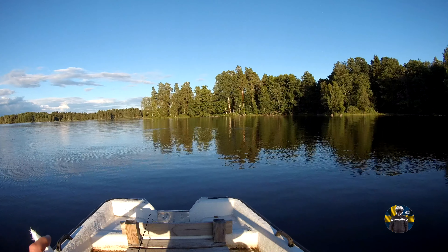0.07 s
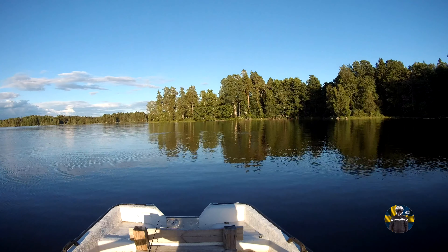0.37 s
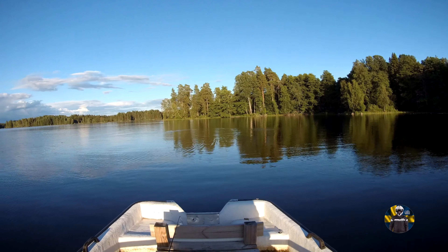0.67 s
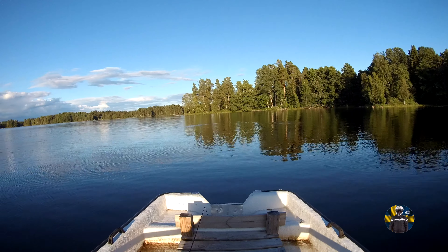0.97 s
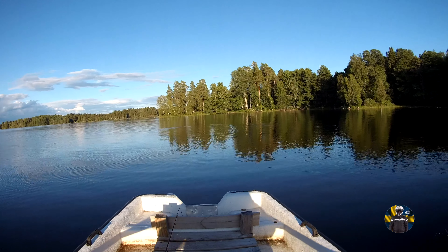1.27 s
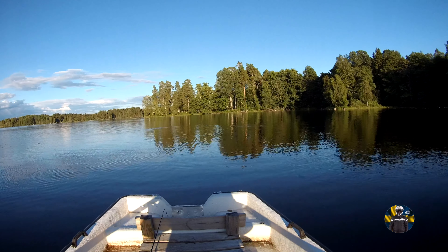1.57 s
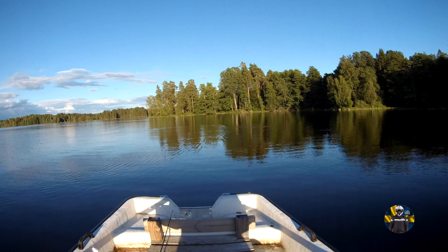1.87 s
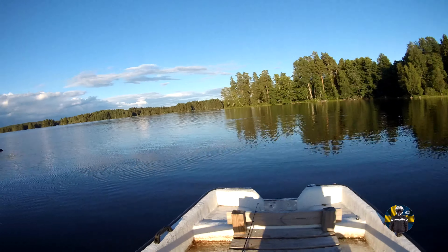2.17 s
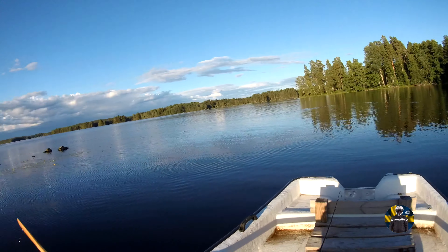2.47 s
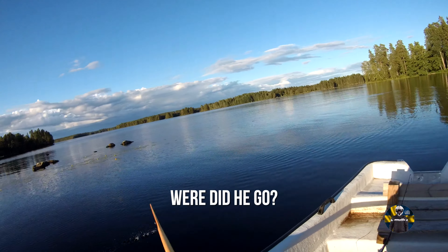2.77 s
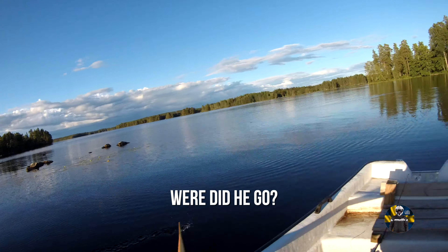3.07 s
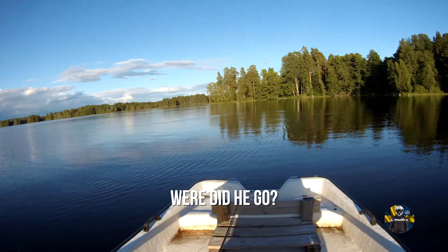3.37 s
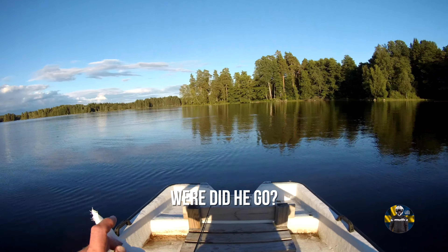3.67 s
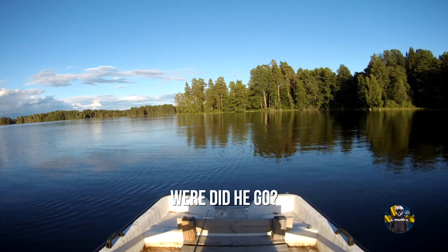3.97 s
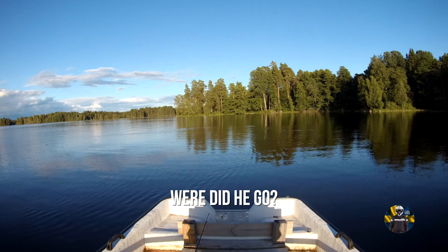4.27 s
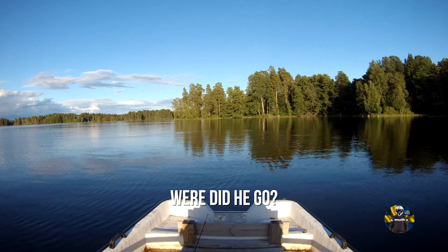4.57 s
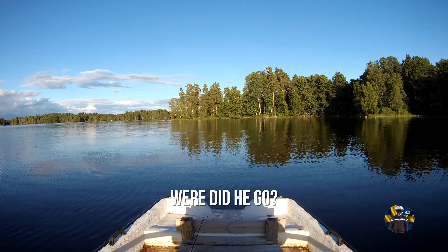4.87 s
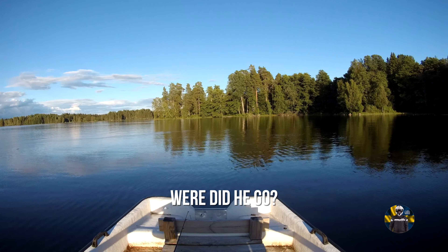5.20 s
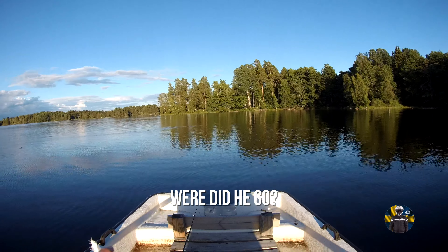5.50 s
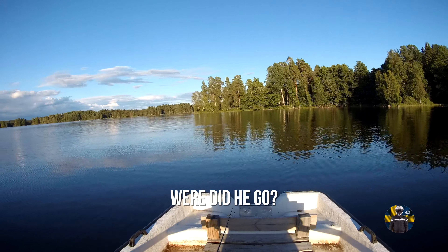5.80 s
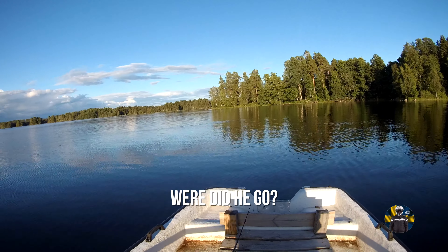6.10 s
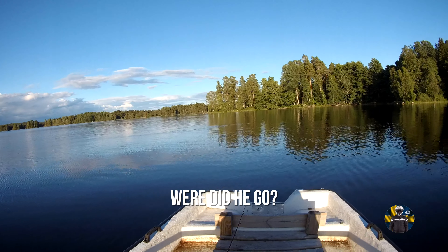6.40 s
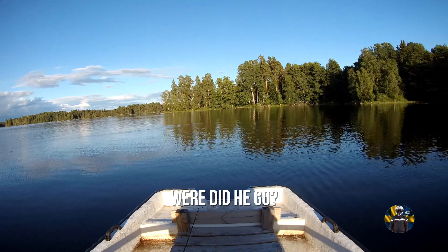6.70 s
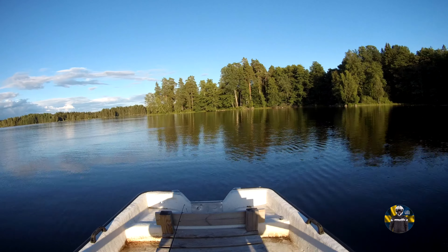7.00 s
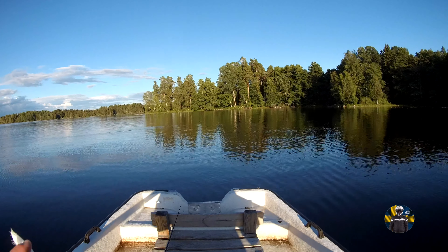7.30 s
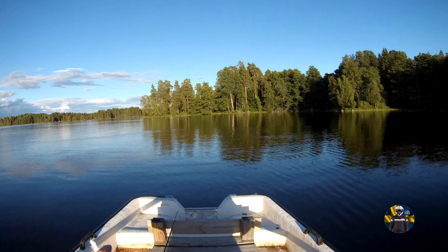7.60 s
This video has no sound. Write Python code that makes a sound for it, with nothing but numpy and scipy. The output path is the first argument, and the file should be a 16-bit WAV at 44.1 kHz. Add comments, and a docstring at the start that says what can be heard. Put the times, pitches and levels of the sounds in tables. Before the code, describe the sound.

Oars creak and knock in a small rowboat through four slow strokes, with low water gulps, drips and faint wind.

```python
"""Wooden barks, clacks and gulps of water: four strokes of a small rowing boat on a calm lake, heard
from the rower's seat. On each swing back, stick-slip friction in a dry rowlock drives the modes of the
hull; the oars strike their pins as the blades leave and enter the water. Trapped air resonates in gulps,
drips and lapping waves, and one eddy gives a rising note. Beneath them the hull booms softly and a
faint wind stirs."""
import sys
import numpy as np
from scipy import signal
from scipy.fft import rfft, irfft
from scipy.io import wavfile
from scipy.ndimage import uniform_filter1d

SR = 44100
rng = np.random.default_rng(int(sys.argv[2]) if len(sys.argv) > 2 else 0)


def transcribe(signal):
    """Save signal, clipped to [-1, 1], as a 16-bit WAV file at the path in sys.argv[1]."""
    frames = np.atleast_2d(signal).T
    limited = np.clip(frames, -1, 1)
    pcm = np.round(limited * 32767).astype(np.int16)
    wavfile.write(sys.argv[1], SR, pcm)


N = 337365
TIME = np.arange(N) / SR
RING_TIME = TIME[:SR // 2]

# Spectrum of the steady hiss. Each row: frequency in Hz, relative density in dB.
HISS_SPECTRUM = [(59, -35), (100, 0.5), (214, -14.5), (281, -13.5), (340, -13.5), (1090, -21),
                 (4370, -33.5), (14200, -35), (15500, -36.5)]
# Spectrum of water washing along the boat. Each row: frequency in Hz, relative density in dB.
WASH_SPECTRUM = [(60, -32), (140, 7), (300, 0.5), (600, -8), (1200, -15), (2500, -32), (6000, -52)]
# The blades finish their pull and lift out. Each row: start in seconds, length in seconds, boom in dB.
BLADE_LIFTS = [(1.14, 0.22, -38.5), (3.117, 0.21, -37.5), (4.902, 0.15, -40), (6.752, .38, -37)]
# The oars swing back and the rower's weight rocks the boat.
# Each row: start in seconds, length in seconds, boom in dB, wash in dB.
OAR_SWINGS = [(0.0, 0.033, -42.5, -42.5), (1.65, 0.24, -41, -51), (3.583, 0.25, -39, -55),
              (5.516, 0.18, -38, -49.5), (7.42, 0.17, -34, -49)]
# The blades dip in. Each row: start in seconds, boom in dB, wash in dB, trickle in dB.
BLADE_DIPS = [(.28, -34.5, -52, -60), (1.96, -33, -47, -60.5), (3.9, -38.5, -46, -60),
              (5.76, -35.5, -58, -64)]
# Small waves folding over. Each row: start in seconds, length in seconds, middle pitch in Hz, level in dB.
FOLDING_WAVES = [(0.328, 0.082, 343, -57), (2.8, 0.21, 219, -52), (3.002, 0.13, 216.7, -36.5),
                 (3.125, .07, 281, -45), (6.205, 0.22, 306, -56), (6.404, 0.042, 475, -46),
                 (6.676, 0.041, 488, -46), (7.067, 0.057, 201, -41), (7.553, 0.046, 746, -52)]
# Water gulping round a blade or under the hull.
# Each row: start in seconds, initial pitch in Hz, level in dB, 60 dB decay time in seconds.
WATER_GULPS = [(0.302, 96, -19.5, 0.099), (1.185, 109, -29, 0.21), (1.313, 103.4, -30.5, 0.3),
               (2.016, 82, -20.5, 0.19), (3.03, 160, -34, 0.081), (3.065, 128, -9, 0.045),
               (3.09, 245, -24, 0.055), (3.174, 165, -13, 0.034), (3.255, 95.2, -21, 0.25),
               (3.29, 45, -22.5, 0.22), (5.074, 100.7, -25, 0.23), (5.53, 154, -32.5, 0.39),
               (6.508, 55.7, -20.5, 0.21), (7.105, 112, -18.5, 0.18), (7.24, 94, -24, .17),
               (7.449, 87, -33, 0.27)]
# Drops and bubbles at the blades. Each row: start in seconds, initial pitch in Hz, level in dB.
BLADE_DROPS = [(0.44, 1234, -35.5), (0.536, 2080, -47), (.547, 1240, -47.5), (1.38, 1580, -44.5),
               (1.455, 3300, -50), (1.53, 1145, -44.5), (1.531, 2100, -49.5), (2.058, 4300, -46),
               (2.16, 2580, -51), (2.3, 2400, -43), (4.056, 2240, -46.5), (4.17, 2400, -50),
               (4.2, 3500, -49), (4.245, 1920, -47), (5.719, 2100, -47), (5.846, 2130, -42.5),
               (5.865, 2140, -42.5), (5.963, 5600, -44.5), (6.953, 1070, -43), (6.986, 1320, -46),
               (7.494, 1110, -32.5), (7.528, 1120, -44)]
# Distinct modes of hull and oar, then of the steel pin in its socket.
# Each row: frequency in Hz, relative resonance height in dB, 60 dB decay time in seconds.
HULL_MODES = [(85.65, 33, 0.92), (151, 16, 0.31), (201.9, 17.5, 0.38), (300.8, 21, 0.13),
              (355.2, 20.5, 0.14), (383.3, 13.5, 0.23), (437.5, 11.5, 0.43), (503, 14.5, 0.33),
              (602, 13, 0.14), (690, 2, 0.4), (716, 13, 0.25), (869, 14, 0.081), (914, 11, 0.11),
              (984, 7, 0.043), (1094, 11, 0.15), (1155, 13, 0.11), (1395, 11.5, 0.11), (1509, 6.5, 0.091),
              (1744, 2, 0.11), (1950, 1, 0.051), (2095, 0.5, 0.047), (2220, -4, 0.083), (2716, -14, 0.077),
              (4910, -4, 0.06), (5380, -6, 0.05), (5530, -9, 0.034), (7300, -23, 0.05)]
PIN_MODES = [(2370, -20, 0.054), (2680, -11.5, 0.1), (2823, -15.5, 0.02), (2904, 0, 0.034)]
# Dense ring of the hull panels, then of a knocked oar.
# Each row: frequency in Hz, relative energy density in dB, 60 dB decay time in seconds.
PANEL_RING = [(117, 13.5, 0.089), (297, 20, 0.37), (860, 8, 0.2), (1430, 6.5, 0.062), (2000, -3, 0.041),
              (2660, -8.5, 0.08), (3440, -10, 0.069), (5300, -7.5, 0.066), (6430, -10, 0.039),
              (7770, -9, 0.036), (8960, -14.5, .05), (15000, -23.5, 0.04)]
OAR_RING = [(50, 27.5, 0.11), (97, 21, 0.29), (264, 22, 0.24), (476, 12.5, 0.18), (940, 6, 0.15),
            (1670, 0, 0.067), (2650, 5.5, 0.087), (3010, -7, 0.18), (3220, 6.5, 0.06), (5560, -10, 0.055),
            (7600, -7, 0.058), (8900, 0, 0.041), (11400, -7.5, 0.057), (14400, 2, 0.027)]
# An oar knocking on its pin.
# Each row: start in seconds, peak clack in dB, thud in dB, metal tick in dB, nominal clink pitch in Hz.
OAR_KNOCKS = [(0.261, -48, -34.5, -61, 2750), (0.2811, -33, -29.5, -47, 2880),
              (0.3316, -41, -35, -64.5, 2790), (0.3423, -46, -45, -56, 2850),
              (1.1771, -45, -37.5, -59, 2470), (1.2981, -38, -36, -47.5, 2900),
              (1.975, -54, -37.5, -65, 2740), (1.9953, -36, -37, -47.5, 2870),
              (3.133, -45, -43, -60.5, 3260), (3.2184, -39.5, -35, -55.5, 2770),
              (3.898, -44, -32.5, -62, 2800), (3.933, -36.5, -36.5, -48, 2746),
              (3.98, -47, -59, -62.5, 2800), (4.891, -57, -60, -64, 2780), (4.947, -46.5, -42, -65, 3530),
              (5.0311, -40.5, -36, -55, 2620), (5.7401, -47, -33.5, -72, 2800),
              (5.7858, -34, -42.5, -48.5, 2640), (6.9492, -47, -59, -57.5, 3720),
              (6.984, -49, -50, -62, 2820), (7.037, -40.5, -36, -51.5, 2300)]
# Runs of fast slips. Each row: start in seconds, length in seconds, initial slips per second,
# unevenness from 0 to 1, level in dB, rasp in dB relative to that level.
CREAK_RUNS = [(0.069, 0.032, 370, 0.27, -48.5, -43), (1.742, 0.056, 296, 0.14, -39.5, -23.5),
              (3.482, 0.062, 283, 0.15, -35.5, -20.5), (5.392, 0.066, 548, 0.05, -37.5, -26),
              (7.293, 0.038, 310, 0.04, -36, -20), (7.468, .04, 330, .2, -47.5, -41)]
# Single slips of the rowlock. Each row: start in seconds, peak bark in dB, low hull ring in dB.
ROWLOCK_SLIPS = [(0.0, -33.5, -35), (0.016, -30, -36.5), (1.581, -29, -39.5), (1.596, -27.5, -36.5),
                 (1.613, -32, -35.5), (1.646, -27, -37), (1.661, -26.5, -32), (1.682, -32.5, -40.5),
                 (1.705, -31, -45.5), (3.602, -30, -37), (3.615, -33.5, -44), (3.644, -38, -49),
                 (3.663, -24, -30), (5.471, -27.5, -33.5), (5.486, -26, -30), (5.519, -29.5, -34.5),
                 (7.295, -28, -35), (7.307, -27, -35), (7.323, -28, -31.5), (7.353, -23.5, -30),
                 (7.386, -25, -28), (7.422, -28.5, -36.5)]

TOP_HZ = 15350
WIND_DB, HISS_TREBLE_DB, BUFFET_DB = -49.5, -65.5, -7.5  # the buffet is relative to the hull boom
DIP_HOLD_S, TRICKLE_DELAY_S, TRICKLE_HOLD_S, LIFT_WASH_DB = 0.056, 0.12, 0.16, -64.5
PIN_HZ = 2800  # nominal pitch of the clink when the pin sits squarely


def undb(db):
    """Decibels express an amplitude ratio on a logarithmic scale; return the ratio."""
    return 10 ** (np.asarray(db) / 20)


def unit(x):
    """Normalisation to an rms of 1."""
    return x / np.sqrt(np.mean(x ** 2) + 1e-20)


def colour(x, points):
    """Spectral shaping by a gain curve through (Hz, dB) points."""
    hz, db = np.transpose(points)
    freqs = np.fft.rfftfreq(len(x), 1 / SR) + 1
    return irfft(rfft(x) * undb(np.interp(np.log(freqs), np.log(hz), db)), len(x))


def band(x, hz, kind="bandpass", order=2):
    """Butterworth filtering, flat within the passband."""
    return signal.sosfilt(signal.butter(order, hz, kind, fs=SR, output="sos"), x)


def walk(per_s):
    """Smoothed random steps give a slow modulation with a spread near 1."""
    hold = int(SR / per_s)
    steps = np.repeat(rng.standard_normal(N // hold + 1), hold)
    return 1.3 * uniform_filter1d(uniform_filter1d(steps, hold), hold)[:N]


def fade(t60):
    """Damping: an exponential decay of 60 dB in t60 seconds."""
    return undb(-60 * RING_TIME / max(t60, 1e-3))


def swell(start, length, attack_s, fall_db_per_s):
    """Envelope of a driven motion: it rises, holds to the end of its length and decays."""
    rise = np.clip((TIME - start) / attack_s + .5, 0, 1)
    return rise * undb(-fall_db_per_s * np.maximum(TIME - start - length, 0))


def stirred(pushes, calm_db, attack_s, fall_db_per_s):
    """Incoherent sources add as powers: calm water plus a swell per (start, length, dB) push."""
    power = sum((undb(db) * swell(start, length, attack_s, fall_db_per_s)) ** 2
                for start, length, db in pushes)
    return np.sqrt(undb(calm_db) ** 2 + power)


def clear_ring(modes):
    """Modal superposition: distinct modes sum as damped sines of alternating sign."""
    return sum((-1) ** k * 2 * undb(db) * fade(t60) / fade(t60).sum() * np.sin(2 * np.pi * hz * RING_TIME)
               for k, (hz, db, t60) in enumerate(modes))


def dense_ring(table):
    """Modal overlap: crowded modes act as noise bands that build as the blow spreads, then decay."""
    hz, db, t60 = np.transpose(table)
    noise = rfft(rng.standard_normal(len(RING_TIME)))
    freqs = np.fft.rfftfreq(len(RING_TIME), 1 / SR)
    edges_hz, out = np.geomspace(50, 16500, 34), 0
    build = 1 - .5 * np.exp(-RING_TIME / 0.0012)
    for low, high in zip(edges_hz, edges_hz[1:]):
        log_centre = np.log(low * high) / 2
        decay = fade(np.interp(log_centre, np.log(hz), t60))
        gain = np.sqrt(2 * (high - low) / SR) * undb(np.interp(log_centre, np.log(hz), db))
        ring = irfft(noise * ((freqs >= low) & (freqs < high)), len(RING_TIME)) * build * decay
        out = out + gain * ring / np.linalg.norm(ring)
    return out


def registers(x, low_hz, high_hz):
    """A crossover splits a ring into low, middle and high parts, each of rms 1 over its first 20 ms."""
    parts = band(x, low_hz, "lowpass", 4), band(x, [low_hz, high_hz], order=4), band(x, high_hz, "highpass", 4)
    return [part / np.std(part[:SR // 50]) for part in parts]


def bubble(hz, t60, rise, onset_cycles):
    """A pocket of air is a damped oscillator whose pitch rises as it nears the surface."""
    t = RING_TIME[:int(t60 * SR) + 2]
    cycles = hz * t * (1 + rise * t / t60 / 2)
    onset = 1 - np.exp(-cycles / onset_cycles)
    return np.sin(2 * np.pi * cycles) * np.exp(-np.log(1000) * t / t60) * onset


def air(rocking):
    """Turbulence: gusts rumble on the microphone, more as the boat rocks, over an even hiss."""
    strength = np.hypot(undb(WIND_DB), undb(BUFFET_DB) * rocking) * undb(1.2 * walk(per_s=6))
    wind = unit(band(rng.standard_normal(N), [29, 64])) * strength
    hiss = colour(band(rng.standard_normal(N), 124, "highpass"), HISS_SPECTRUM)
    treble_rms = np.std(band(hiss, 2300, "highpass", order=4))
    return wind + hiss / treble_rms * undb(HISS_TREBLE_DB)


def hull_forcing():
    """Water pressure forces the hull: the envelope swells with each lift, swing and dip of the oars."""
    swings = [(start, length, db) for start, length, db, _ in OAR_SWINGS]
    dips = [(start, DIP_HOLD_S, db) for start, db, _, _ in BLADE_DIPS]
    return stirred(BLADE_LIFTS + swings + dips, calm_db=-53.5, attack_s=0.069, fall_db_per_s=80)


def hull_boom(rocking):
    """Forced resonance: moving water keeps the lowest hull mode in a wavering hum amid a low rumble."""
    hz = HULL_MODES[0][0] * (1 + 0.073 * walk(35))
    hum = np.sin(2 * np.pi * np.cumsum(hz) / SR) * undb(1.16 * walk(30))
    rumble = unit(band(rng.standard_normal(N), [60, 135]))
    return (hum + 0.53 * rumble) * rocking


def trickle(count=5200):
    """Tiny resonating bubbles and ticks of spray merge into a trickle that swells after each dip."""
    spray = np.zeros(N)
    for when, pitch, size, life in rng.random((count, 4)):
        hz = 950 * 8 ** pitch
        strength = undb(min(-4.2 * np.log(1 - size), 15) - 6 * pitch)
        cycles = 2.5 + 26 * life ** 3
        add(spray, when * N / SR, strength * bubble(hz, cycles / hz, rise=0.38, onset_cycles=0.17))
    drips = [(start + TRICKLE_DELAY_S, TRICKLE_HOLD_S, db) for start, _, _, db in BLADE_DIPS]
    return unit(spray) * stirred(drips, calm_db=-71, attack_s=0.088, fall_db_per_s=81)


def wash():
    """Flow noise: every move of the oars washes water along the boat."""
    flow = unit(colour(rng.standard_normal(N), WASH_SPECTRUM)) * undb(2.0 * walk(22))
    lifts = [(start, length, LIFT_WASH_DB) for start, length, _ in BLADE_LIFTS]
    swings = [(start, length, db) for start, length, _, db in OAR_SWINGS]
    dips = [(start, DIP_HOLD_S, db) for start, _, db, _ in BLADE_DIPS]
    return flow * stirred(lifts + swings + dips, calm_db=-56, attack_s=0.026, fall_db_per_s=83)


def lapping_waves(bubbles_per_wave=14):
    """A folding wave traps bubbles of many sizes; larger ones resonate lower and tend to be stronger."""
    out = np.zeros(N)
    for start, length, middle_hz, db in FOLDING_WAVES:
        swarm = np.zeros(N)
        for when, spread, strength in rng.random((bubbles_per_wave, 3)):
            ratio = 2 ** (spread - .5)
            hz = middle_hz * ratio
            note = bubble(hz, 24 / hz, rise=0.093, onset_cycles=0.11)
            add(swarm, when * length, (0.085 + strength) / ratio ** 1.2 * note)
        rms = np.sqrt(np.sum(swarm ** 2) / (length * SR))
        add(out, start, undb(db) * swarm / rms)
    return out


def eddy(start_s=2.735, length_s=0.287, start_hz=72, rise_hz_per_s=152, db=-31):
    """Vortex sound: the hollow, wavering note of an eddy climbs as it tightens behind one blade."""
    hz = start_hz + rise_hz_per_s * np.maximum(TIME - start_s, 0)
    phase = 2 * np.pi * np.cumsum(hz * (1 + 0.053 * walk(45.04))) / SR
    level = undb(db + 1.5 * walk(40)) * swell(start_s, length_s, attack_s=.04, fall_db_per_s=260)
    return level * (np.sin(phase) + 0.1 * np.sin(2 * phase))


def gulps_and_drops(drop_cycles=46, spatter_db=-9):
    """Bubble resonance: large pockets gulp; drops spatter and ring, smaller bubbles more briefly."""
    out = np.zeros(N)
    for start, hz, db, t60 in WATER_GULPS:
        add(out, start, undb(db) * bubble(hz, t60, rise=0.1, onset_cycles=0.58))
    for start, hz, db in BLADE_DROPS:
        spatter = unit(band(rng.standard_normal(len(RING_TIME)), [hz * 0.47, hz * 1.22])) * fade(0.041)
        add(out, start, undb(db + spatter_db) * spatter)
        add(out, start, undb(db) * bubble(hz, drop_cycles / hz, rise=0.17, onset_cycles=0.32))
    return out


def oar_knocks():
    """Impact: the oar takes up its play, the pin ticks and clinks, wood clacks and a thud swells."""
    out, shared_ring = np.zeros(N), dense_ring(OAR_RING)
    build = 1 - np.exp(-RING_TIME / 0.0054)
    hardest_db = max(row[1] for row in OAR_KNOCKS)
    for start, clack_db, thud_db, tick_db, clink_hz in OAR_KNOCKS:
        thud, clack, tick = registers(shared_ring + dense_ring(OAR_RING), low_hz=1330, high_hz=6230)
        # the pin's modes shift together as it seats differently
        pin = clear_ring([(hz * clink_hz / PIN_HZ, db, t60) for hz, db, t60 in PIN_MODES])
        clink_db = clack_db - 3 + 0.46 * (clack_db - hardest_db)  # harder knocks ring the steel more
        wood = undb(thud_db) * thud * build + undb(clack_db) * clack / np.abs(clack).max()
        steel = undb(clink_db) * pin / np.abs(pin).max() + undb(tick_db) * tick
        add(out, start, wood + steel)
    return out


def rowlock_creaks(modes, panels, bend=.018):
    """Repetition pitch: when the oar swings fast, the slips follow so closely that they fuse to a tone."""
    out, ring = np.zeros(N), band(modes + 0.67 * panels, 520, "highpass", order=1)
    ring = band(ring, 330, "highpass")  # slips this light hardly move the deep modes
    for start, length, rate_hz, uneven, db, rasp_db in CREAK_RUNS:
        gap_scatter, size_scatter = rng.standard_normal((80, 2)).T
        times = np.cumsum(np.exp(uneven * gap_scatter)) / rate_hz
        times -= times[0]
        times /= 1 + bend * times / length  # the swing speeds up, so the pitch bends upward
        inside = times < length
        kicks = np.zeros(len(RING_TIME))
        kicks[(times[inside] * SR).astype(int)] = undb(17 * uneven * size_scatter[inside])
        creak = signal.fftconvolve(kicks, ring)[:len(RING_TIME)]
        body, rasp = band(creak, 3040, "lowpass", order=4), band(creak, [4200, 8800], order=3)
        n = int(length * SR)
        add(out, start, undb(db) * (body / np.std(body[:n]) + undb(rasp_db) * rasp / np.std(rasp[:n])))
    return out


def rowlock_slips(modes, panels, rasp_db=-26.5):
    """Stick-slip friction: each slip kicks the hull, and the ring varies as the contact point shifts."""
    out = np.zeros(N)
    for start, bark_db, low_db in ROWLOCK_SLIPS:
        ring = modes + .4 * panels + .42 * dense_ring(PANEL_RING)
        low, bark, rasp = registers(ring, low_hz=674, high_hz=2930)
        scrape = bark / np.abs(bark).max() + undb(rasp_db) * rasp
        add(out, start, undb(low_db) * low + undb(bark_db) * scrape)
    return out


def add(out, start_s, x):
    """Linear superposition of a sound from its starting time."""
    i = int(np.clip(start_s * SR, 0, N - 1))
    out[i:i + len(x)] += x[:N - i]


def scene():
    """The pressures of boat, water and air sum at one point."""
    modes, panels, rocking = clear_ring(HULL_MODES), dense_ring(PANEL_RING), hull_forcing()
    boat = rowlock_slips(modes, panels) + rowlock_creaks(modes, panels) + oar_knocks() + hull_boom(rocking)
    water = gulps_and_drops() + eddy() + lapping_waves() + trickle() + wash()
    return (boat + water + air(rocking))[None]


def record(dry):
    """Band limiting: a steep low-pass filter removes the highest treble."""
    return signal.sosfilt(signal.ellip(10, .2, 70, TOP_HZ, fs=SR, output="sos"), dry)


dry = scene()
out = record(dry)
transcribe(out)
```